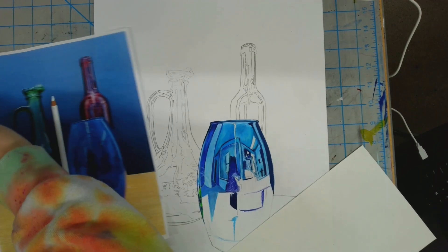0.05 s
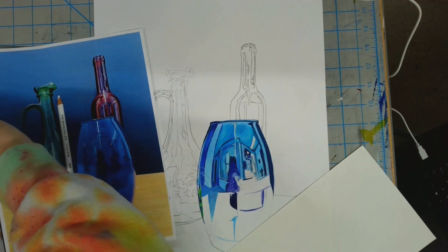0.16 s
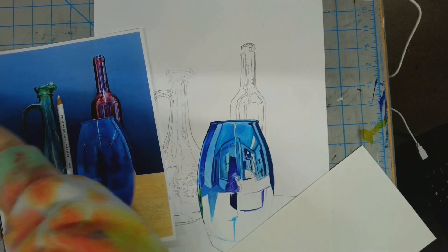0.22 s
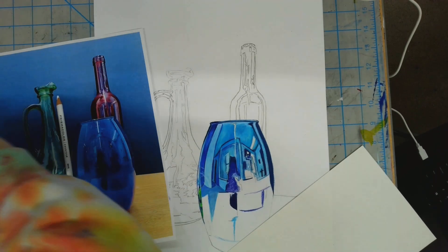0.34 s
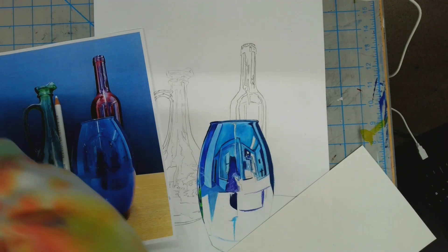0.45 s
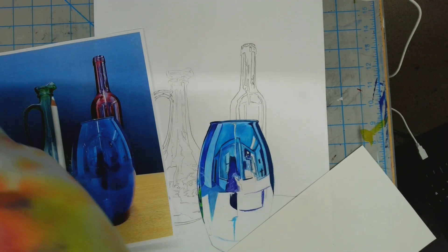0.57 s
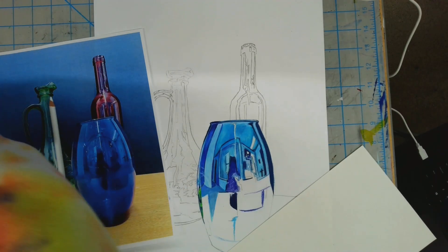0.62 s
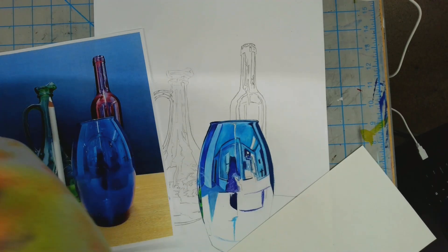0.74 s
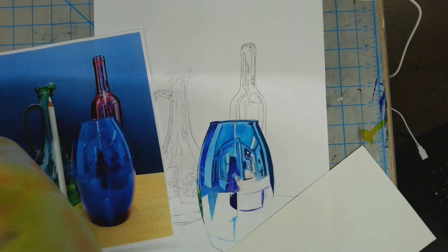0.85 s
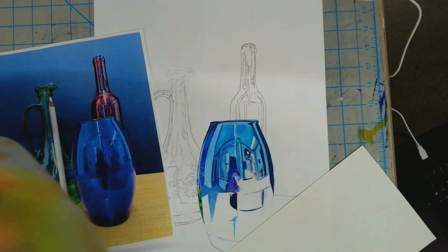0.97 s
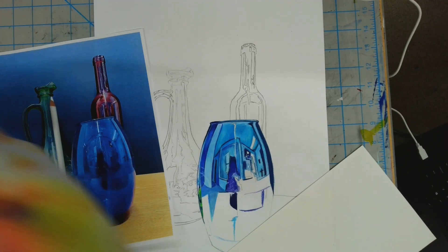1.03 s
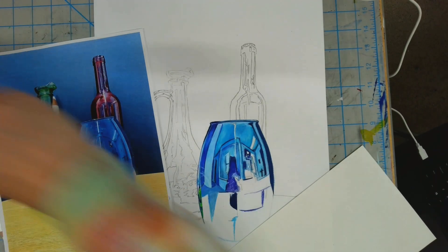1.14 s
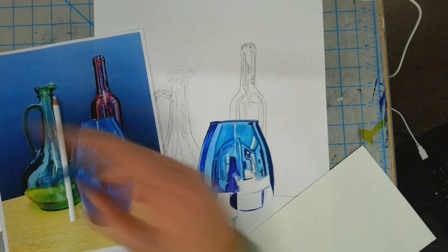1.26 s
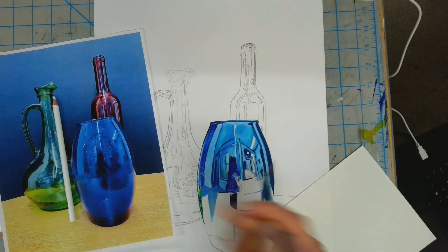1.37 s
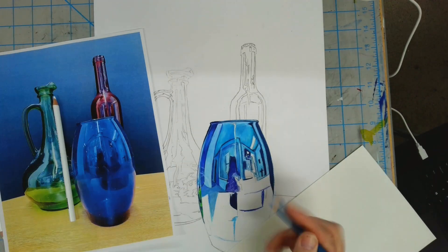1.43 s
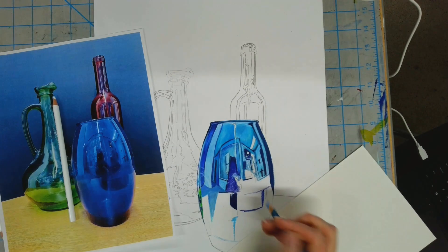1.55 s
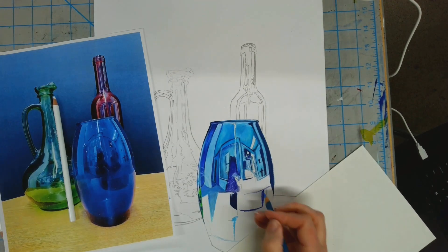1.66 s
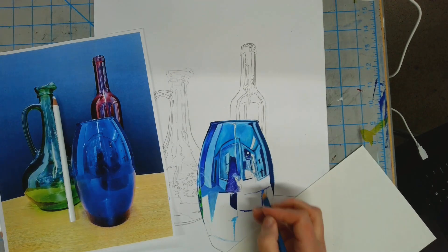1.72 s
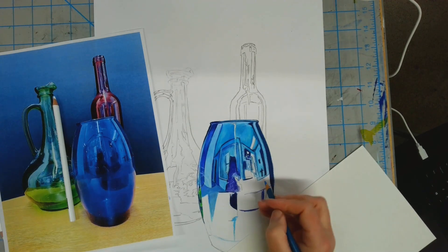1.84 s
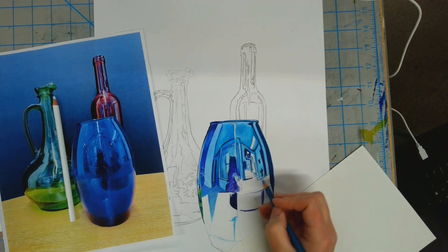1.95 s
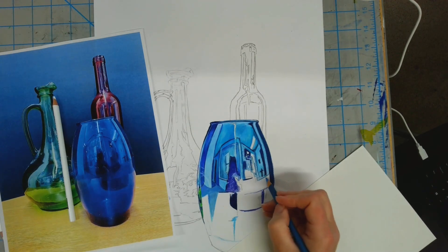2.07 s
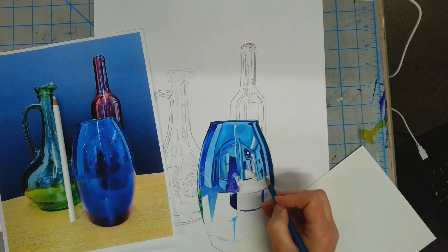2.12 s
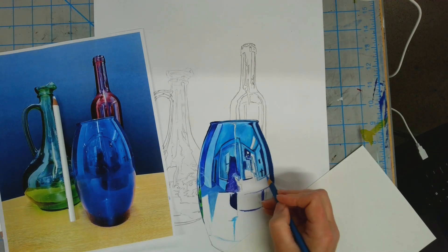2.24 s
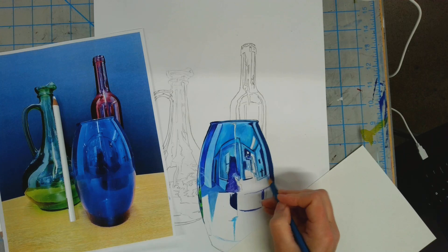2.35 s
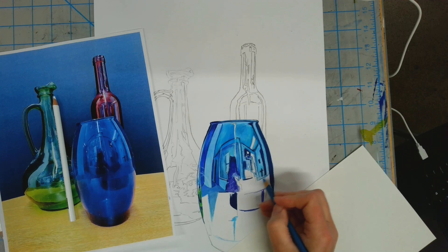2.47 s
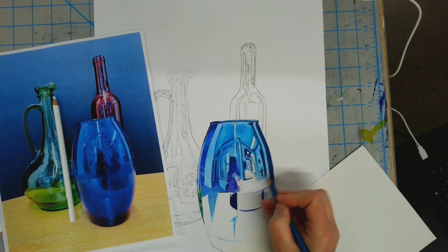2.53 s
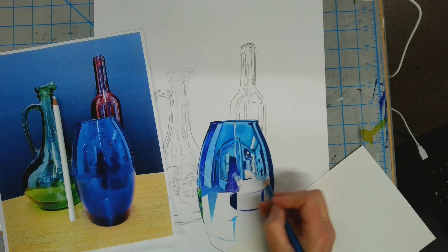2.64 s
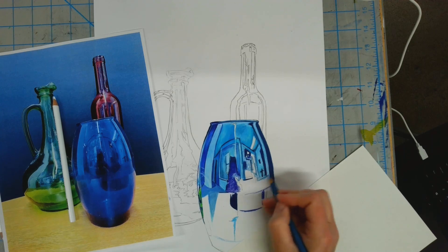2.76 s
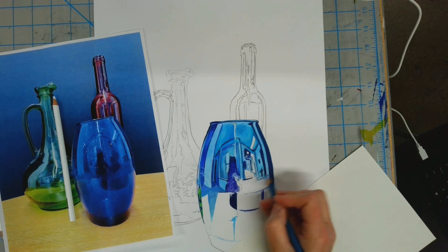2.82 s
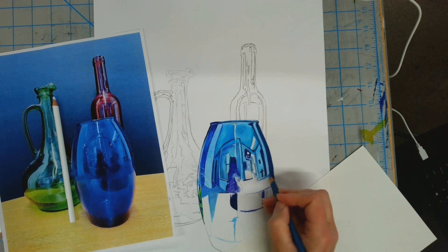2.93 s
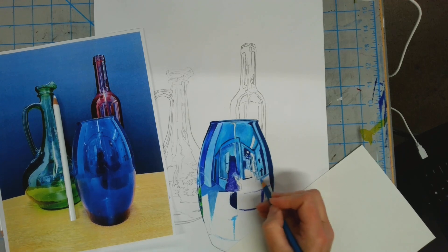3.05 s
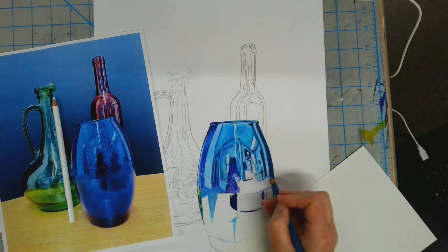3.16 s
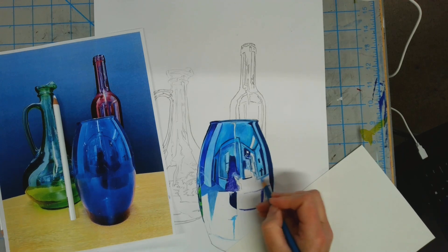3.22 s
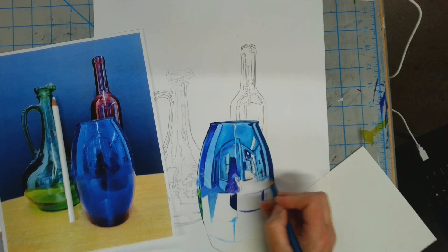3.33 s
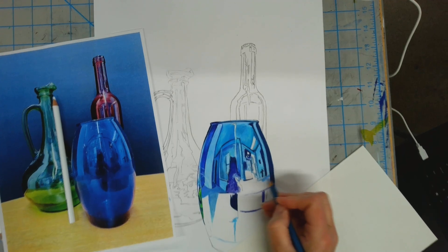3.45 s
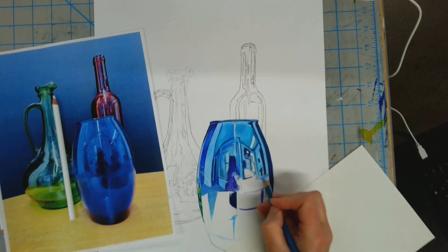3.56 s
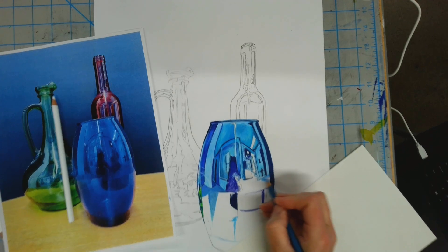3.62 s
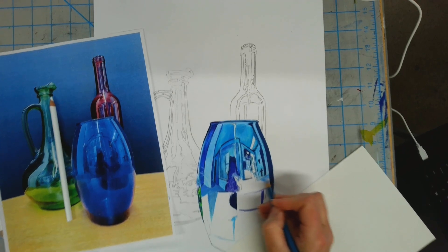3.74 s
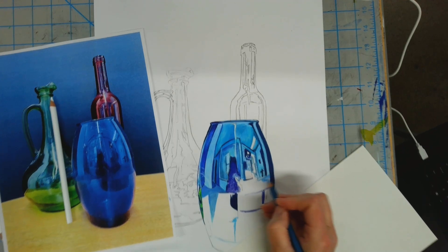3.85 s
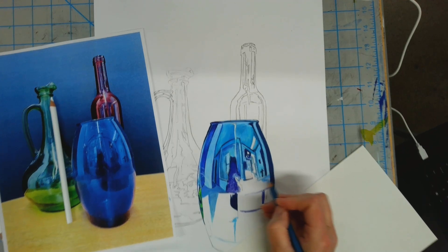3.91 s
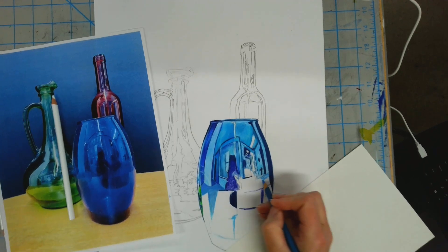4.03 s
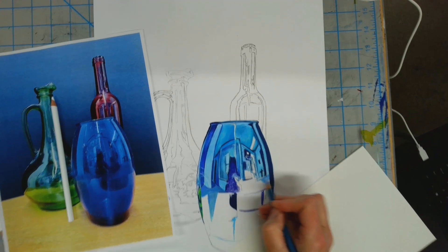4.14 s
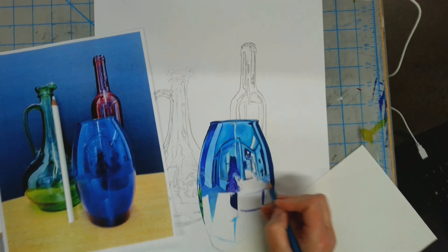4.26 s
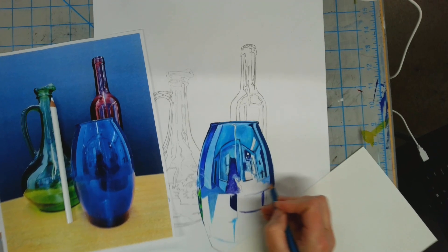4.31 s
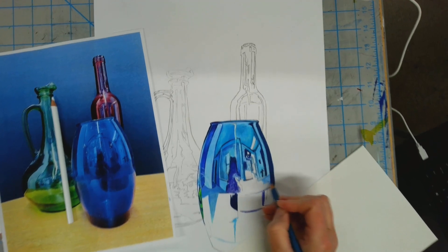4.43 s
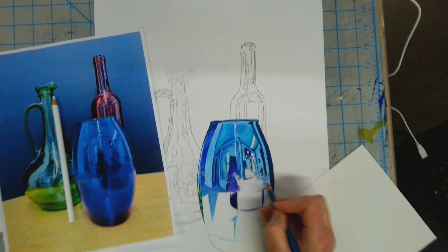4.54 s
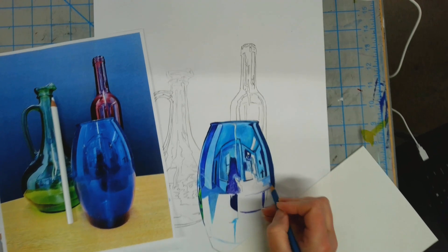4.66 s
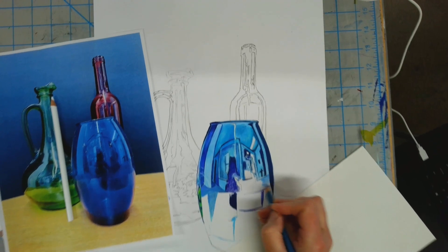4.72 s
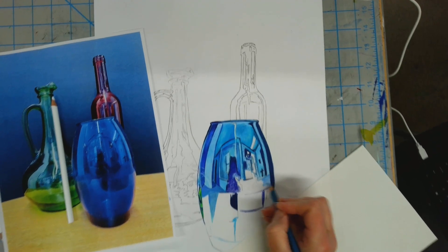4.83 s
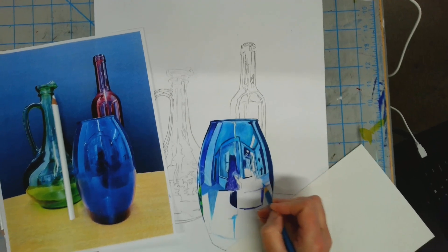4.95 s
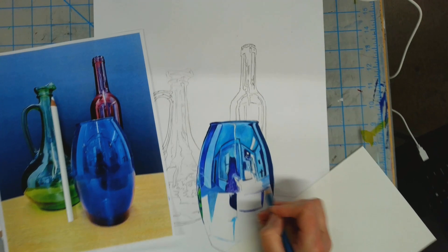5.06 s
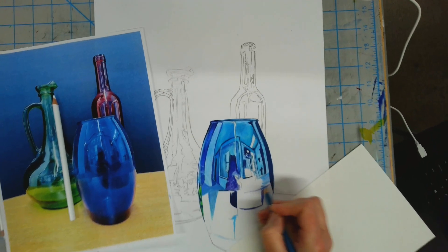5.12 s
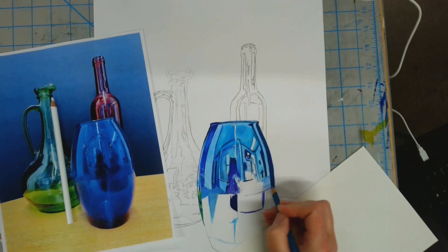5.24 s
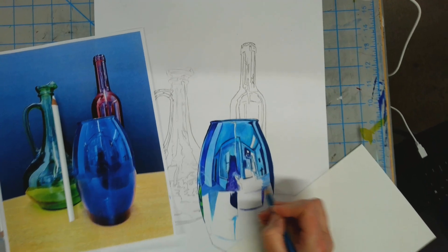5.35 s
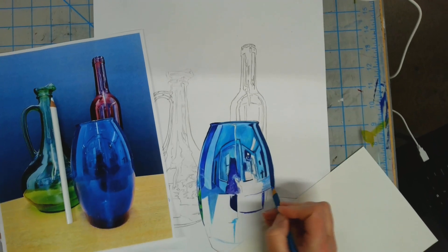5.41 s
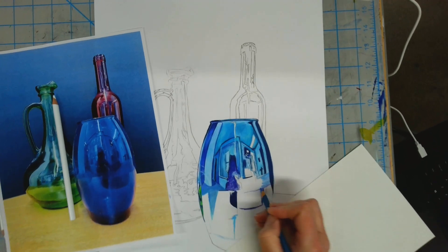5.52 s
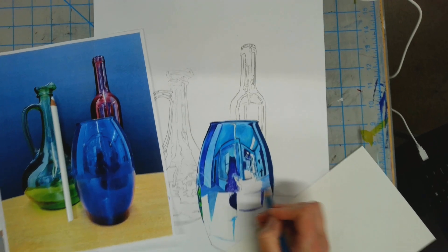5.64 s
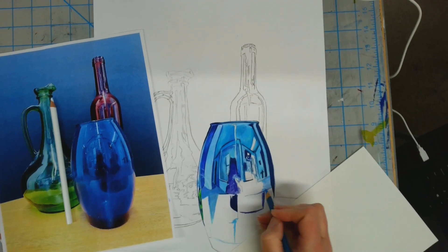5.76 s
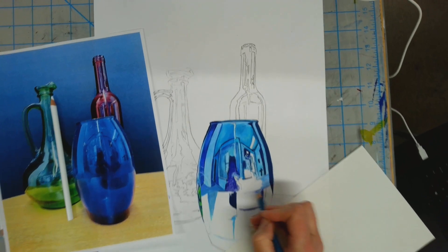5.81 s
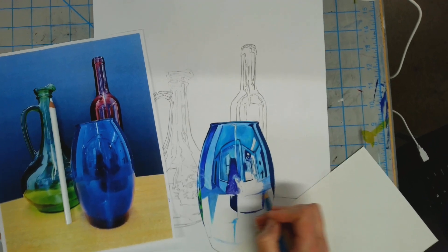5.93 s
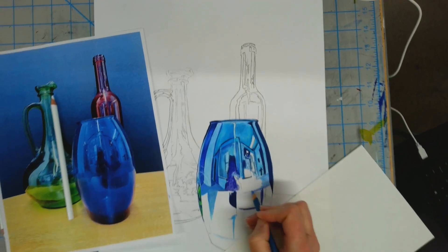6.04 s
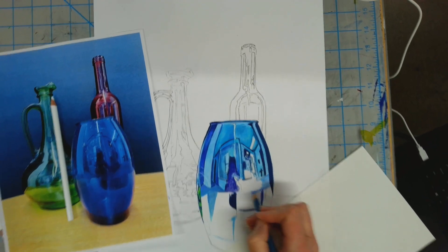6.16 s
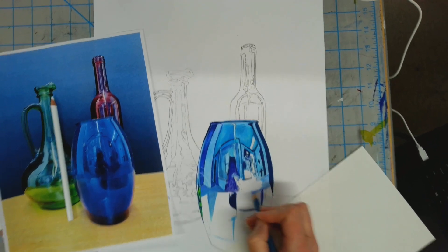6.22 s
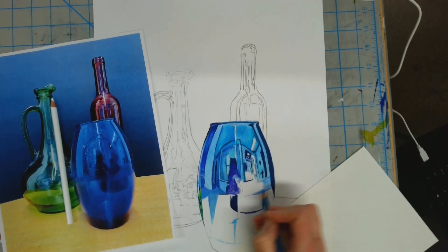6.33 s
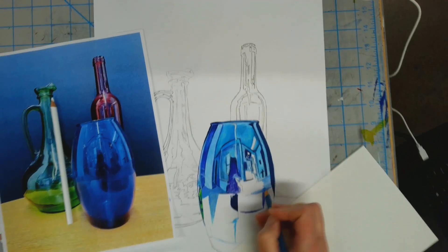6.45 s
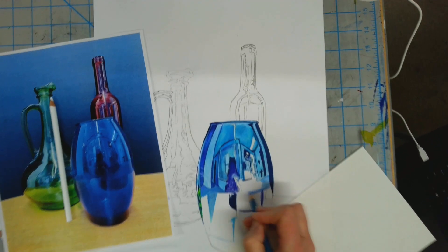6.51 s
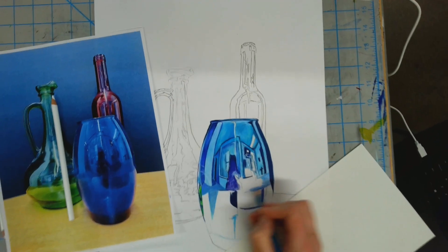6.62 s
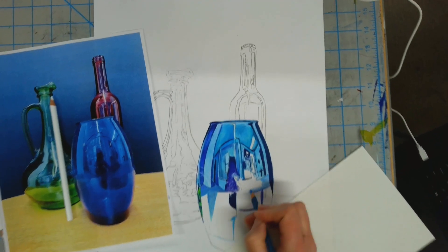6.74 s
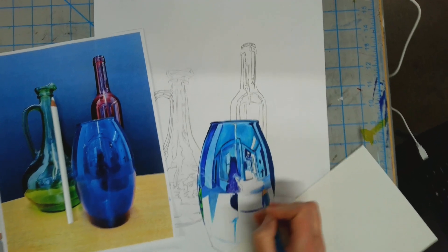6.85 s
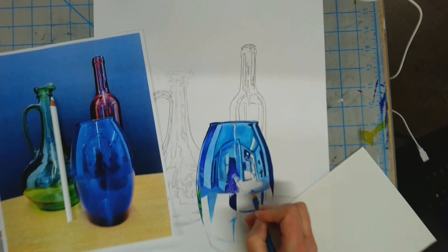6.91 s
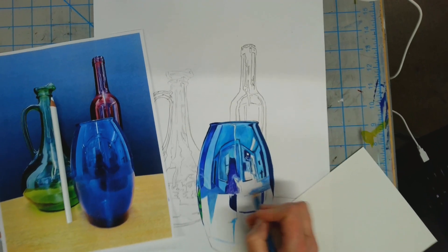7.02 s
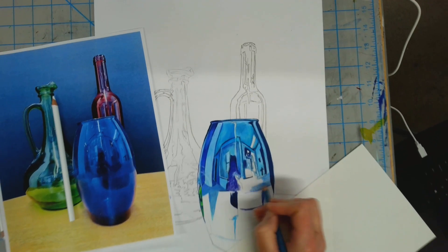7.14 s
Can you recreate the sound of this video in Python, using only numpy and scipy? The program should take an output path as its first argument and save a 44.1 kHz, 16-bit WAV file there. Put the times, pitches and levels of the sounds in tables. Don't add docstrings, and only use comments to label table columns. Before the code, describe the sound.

A sheet slides, a pencil clatters down and rattles on a desk, then quick steady pencil shading scratches on paper in a quiet room.

```python
import sys
import numpy as np
from scipy import signal
from scipy.fft import rfft, irfft
from scipy.io import wavfile
from scipy.ndimage import uniform_filter1d

SR = 44100
rng = np.random.default_rng(int(sys.argv[2]) if len(sys.argv) > 2 else 0)


def volts_from_db(level):
    exponent = np.asarray(level, float) / 20
    return 10 ** exponent


def master_out(mix):
    frames = np.transpose(np.atleast_2d(mix))
    ceiling = np.clip(frames, -1, 1)
    pcm = np.round(ceiling * 32767).astype(np.int16)
    wavfile.write(sys.argv[1], SR, pcm)


N = 316638
TIME = np.arange(N) / SR

# f/Hz, level/dB
AIR_COLOUR = [(25, -72), (45, -37.5), (80, -17.5), (126, -2.5), (185, -1), (264, -8.5), (340, -11.5),
              (480, -16), (620, -22), (870, -24.5), (1100, -30.5), (1840, -35.5), (3700, -41.5),
              (10600, -48)]
# t/s, level/dB
RUMBLE_SWELL = [(0.0, -48), (0.16, -46.5), (0.26, -53.5), (0.66, -46.5), (0.76, -51), (0.94, -47),
                (1.1, -57), (1.2, -49), (1.7, -52), (1.84, -47), (2.1, -53.5), (3.16, -51), (5.36, -52),
                (5.62, -50.5), (6.4, -51), (6.76, -52.5), (6.86, -46), (7.18, -52)]
# t/s, level/dB, t60/s
FAR_KNOCKS = [
    (4.402, -59.5, 0.84),
]
# f/Hz, density/dB
ROOM_COLOUR = [(600, -22), (1200, 4), (2000, 6.5), (3000, 2.5), (4500, 2), (7000, -0.5), (10000, -24.5)]
# t/s, level/dB
SLEEVE_LEVEL = [(0, -71.5), (.45, -66), (1.15, -66), (1.45, -69), (2.3, -73), (4.3, -69), (5.6, -69),
                (7.18, -68.5)]
# f/Hz, density/dB
CLOTH_COLOUR = [(1200, -28.5), (2500, -15), (4500, -12), (6000, -7), (7000, 0.5), (8000, -8), (9500, -20),
                (10800, -31.5)]
# t/s, hiss level/dB
SLIDES = [
    [(0.0, -42), (0.03, -49.5), (0.118, -41.5), (0.166, -68)],
    [(1.5, -73), (1.63, -80), (1.702, -58.5), (1.728, -66.5), (1.822, -53.5), (2.042, -61.5), (2.094, -77)],
]
# f/Hz, density/dB
SLIDE_COLOUR = [(2530, -37), (4300, -10.5), (4800, -10), (5710, -13), (6930, -4), (7470, -7.5),
                (8340, -17.5), (9280, -21.5), (10000, -27.5), (10600, -30.5), (13800, -69), (22000, -120)]
# f/Hz, density/dB
DRAG_COLOUR = [(250, -20), (600, -2), (1200, -12.5), (2200, -14.5), (3300, -2), (4300, 5), (5500, -3),
               (7000, -27.5), (9000, -59.5)]
# t/s, peak/dB, ring f/Hz, ring share/dB, weight on the desk/dB
TAPS = [(0.2093, -48, 7500, -9, -17), (0.2274, -60, 6900, -10, -22), (0.4442, -48, 3230, 4, -10),
        (0.4725, -27, 6500, -1, -23.5), (0.4805, -37, 6610, -1, -38), (0.494, -49, 7080, 10, -24),
        (0.506, -37, 7180, -9, -20), (0.5156, -13.5, 7140, -10, -10), (0.5246, -22.5, 6810, -19, -2.5),
        (0.5442, -32.5, 3230, 2, -20), (0.5521, -50, 3250, -14.5, 3), (0.5641, -32, 3290, 0, -4.5),
        (0.6405, -30.5, 7640, 5, -13), (0.6542, -43, 7460, -6, -6), (0.731, -36.5, 4970, -12, -17),
        (0.7972, -19, 6740, 0.5, -21), (0.8062, -32, 6550, -21, -24), (0.8125, -25, 6700, -8, -28),
        (0.8219, -32, 6550, -32, -37), (1.069, -46, 7340, 5.5, -27), (1.244, -63, 6950, 13, -34),
        (1.3604, -60, 6800, 5, -19)]
# f/Hz, level/dB, t60/s
DESK_MODES = [(140, -27, .04), (363, -12, 0.041), (496, -0.5, 0.018), (676, -5, 0.027), (1178, 2, 0.093),
              (1430, -3.5, 0.047), (1517, 3, 0.032), (1830, 2.5, 0.029), (2290, -0.5, 0.063),
              (2770, -3, 0.018), (2930, -0.5, 0.019)]
# f/Hz, density/dB
CRACK_COLOUR = [(880, -23), (1500, -14), (2900, -3), (3400, -6), (3850, 2.5), (5600, -9), (7150, 7),
                (9560, -24), (10600, -35), (13800, -118), (22000, -120)]
# f/Hz, density/dB
BOUNCE_COLOUR = [(880, -33), (1500, -34), (2260, -9), (3000, -8.5), (4350, 1), (5470, -6.5), (6450, 6.5),
                 (6830, 3), (10600, -35), (13800, -93), (22000, -120)]
# f/Hz, density/dB
RATTLE_COLOUR = [(410, -11.5), (700, -5.5), (1200, -4), (1680, -16), (1840, -9.5), (5950, -19),
                 (6670, -6.5), (9380, -31), (10600, -30), (13800, -91), (22000, -120)]
# t/s, f/Hz, level/dB, t60/s
PINGS = [(0.5458, 3230, -36, 0.061), (0.566, 3290, -45, 0.06), (0.6402, 4670, -43, 0.06),
         (.7315, 4800, -60, 0.11), (0.5062, 7000, -33, 0.017), (.655, 7600, -56, 0.36),
         (.665, 4740, -65, .2), (.98, 2950, -74.5, .9)]
# start t/s, length/s, tip hiss level/dB
PUSHES = [(2.285, 0.024, -66), (2.44, 0.054, -62), (2.62, 0.051, -58.5), (2.81, .047, -58.5),
          (2.999, .05, -59), (3.18, .044, -57), (3.356, 0.053, -59), (3.55, 0.034, -56.5),
          (3.732, 0.04, -57), (3.92, 0.041, -57.5), (4.107, 0.039, -55), (4.291, 0.043, -57),
          (4.457, 0.07, -57.5), (4.664, 0.049, -58), (4.849, 0.047, -57), (5.029, 0.06, -56.5),
          (5.221, 0.048, -55), (5.414, 0.066, -57), (5.607, 0.062, -56), (5.791, 0.049, -58),
          (5.966, .065, -56.5), (6.149, .056, -58.5), (6.328, 0.052, -59), (6.508, 0.058, -58.5),
          (6.695, 0.047, -61), (6.873, 0.036, -58), (7.053, 0.046, -58)]
# start t/s, length/s, tip hiss level/dB
PULLS = [(2.36, .041, -64.5), (2.528, 0.052, -60.2), (2.712, 0.056, -59.5), (2.904, 0.038, -59.5),
         (3.082, 0.062, -59.5), (3.269, 0.055, -58), (3.451, 0.052, -58), (3.64, 0.046, -59.5),
         (3.82, 0.054, -60), (4.006, .052, -59.5), (4.192, 0.05, -58), (4.381, .059, -57),
         (4.563, .059, -58.5), (4.751, .051, -57), (4.94, 0.044, -57.5), (5.125, 0.045, -56),
         (5.312, 0.051, -56.5), (5.512, 0.047, -56.5), (5.701, 0.046, -58.5), (5.885, 0.036, -56),
         (6.059, 0.047, -56), (6.234, 0.059, -56), (6.414, 0.059, -56.5), (6.594, 0.067, -59.5),
         (6.779, .054, -57.5), (6.956, 0.053, -55), (7.152, 0.016, -57)]
# t/s, sheet body minus hiss/dB, pressure gain start to end/dB, share of the sharp point/0-1
PUSH_GRIP = [(2.3, -14.5, 4, 0.4), (3.6, -13.5, -0.5, 0.35), (5.2, -14, -5.5, 0.5), (5.9, -10, -10, 0.2),
             (7.1, -12, -3, 0.5)]
# t/s, body minus hiss/dB, pressure gain/dB, sharp share/0-1
PULL_GRIP = [(2.3, -15, 6, 0.58), (3.3, -14.5, -3, 0.5), (5.0, -15.5, 1.5, 0.57), (6.0, -13, 5.5, .3),
             (7.1, -14.5, 6.5, .6)]
# f/Hz, density/dB
POINT_COLOUR = [(2530, -44), (4300, -20), (5040, -18), (5820, -12.5), (6650, -0.5), (7470, 2), (8660, -7),
                (9000, -19.5), (10000, -25), (10600, -17.5), (13800, -68.5), (22000, -120)]
# f/Hz, density/dB
FLANK_COLOUR = [(2530, -38), (4300, -16.5), (5000, -12.5), (5870, -7.5), (6750, -4.5), (7040, -0.5),
                (8190, -15), (8960, -23), (9970, -24.5), (10600, -27), (13800, -66.5), (22000, -120)]
# f/Hz, density/dB
SHEET_COLOUR = [(900, -28.5), (1800, -18), (2600, -6), (3300, 0), (4300, 5), (5500, -24), (7000, -3.5),
                (9000, -61)]
# t/s, share of mid lines kept/0-1
STARVED = [(.173, .08), (.637, .04), (.776, .07), (1.473, .015), (1.518, .07), (1.773, .04), (2.334, .08),
           (2.773, .02), (3.309, .03), (3.4, .04), (3.468, .02), (4.074, .02), (4.167, .04), (4.259, .03),
           (4.885, .02), (5.024, .02), (5.117, .01), (5.374, .04), (5.721, .04), (6.024, .05),
           (6.418, .004), (6.441, .008), (6.999, .02)]
TOP_HZ = 11300


def colour(x, points, size=1024):
    hz, db = np.transpose(points)
    grid = np.maximum(np.arange(size + 1) * SR / (2 * size), 1)
    gain = volts_from_db(np.interp(np.log(grid), np.log(hz), db))
    cepstrum = irfft(np.log(gain))
    cepstrum[1:size] *= 2
    cepstrum[size + 1:] = 0
    response = irfft(np.exp(rfft(cepstrum)))
    response = response / np.sqrt(np.sum(response ** 2))
    return signal.fftconvolve(x, response)[:len(x)]


def walk(rate):
    hold = int(SR / rate)
    steps = np.repeat(rng.standard_normal(N // hold + 1), hold)
    smooth = uniform_filter1d(uniform_filter1d(steps, hold), hold)
    return 1.3 * smooth[:N]


def ring(t, hz, t60):
    return np.sin(2 * np.pi * hz * t) * volts_from_db(-60 * t / t60)


def slips(scatter_db, patchy_db):
    size = rng.standard_normal(N) * volts_from_db(scatter_db * rng.exponential(size=N))
    return size / np.sqrt(np.mean(size ** 2)) * volts_from_db(patchy_db * walk(60))


def air():
    wash = colour(rng.standard_normal(N), AIR_COLOUR, size=4096)
    low = signal.sosfiltfilt(signal.butter(2, 350, fs=SR, output="sos"), wash)
    swell_db = np.interp(TIME, *np.transpose(RUMBLE_SWELL)) + 0.5 + 0.74 * walk(9.9)
    fan_level = np.sqrt(2) * volts_from_db(-69.5 + 1.0 * walk(2.5))
    fan_hz = 181.4 * (1 + 0.01187 * walk(3.6))
    fan = fan_level * np.sin(2 * np.pi * np.cumsum(fan_hz) / SR)
    return volts_from_db(swell_db) * low + volts_from_db(-53) * (wash - low) + fan


def far_knock():
    fade = np.zeros(N)
    for start, db, t60 in FAR_KNOCKS:
        fade += volts_from_db(db - 60 * np.maximum(TIME - start, 0) / t60) * (TIME >= start)
    return colour(fade * rng.standard_normal(N), ROOM_COLOUR)


def sliding():
    hiss, body = np.zeros((2, N))
    for t, db in map(np.transpose, SLIDES):
        drag_db = np.interp(TIME, t, db, left=-160, right=-160)
        hiss += volts_from_db(drag_db + 2.5)
        body += volts_from_db(-49 - 9 + 0.7 * (drag_db + 50.5))
    tooth = slips(scatter_db=2.0, patchy_db=0.4)
    sleeve = volts_from_db(np.interp(TIME, *np.transpose(SLEEVE_LEVEL))) * slips(scatter_db=1.9, patchy_db=1.0)
    drag = colour(hiss * tooth, SLIDE_COLOUR) + colour(body * tooth, DRAG_COLOUR)
    return drag + colour(sleeve, CLOTH_COLOUR)


def taps():
    out, t = np.zeros(N + SR), np.arange(SR // 2) / SR
    rise = 1 - np.exp(-t / 0.00016)
    desk = sum(volts_from_db(db) * ring(t, hz, t60) for hz, db, t60 in DESK_MODES)
    for start, db, hz, ring_db, weight_db in TAPS:
        noise = rng.standard_normal((3, len(t)))
        burst = (t == 0) + volts_from_db(-14.5) * noise[0] * volts_from_db(-60 * t / 0.014)
        crack = colour(burst, CRACK_COLOUR if start < 0.7 else BOUNCE_COLOUR, size=256)
        crack = crack / np.abs(crack).max() + volts_from_db(-10) * ring(t, 4900, 0.0055)
        rattle_db = -16 + 0.45 * weight_db - 0.46 * (db + 39)
        rattle = colour(noise[1] * volts_from_db(-60 * t / 0.45), RATTLE_COLOUR, size=256)
        room = colour(noise[2] * volts_from_db(-60 * t / 0.72), ROOM_COLOUR, size=256)
        hit = crack + volts_from_db(ring_db) * ring(t, hz, 0.011) + volts_from_db(weight_db - 11) * desk
        hit += volts_from_db(rattle_db) * rattle + volts_from_db(-39) * room
        out[int((start + 0.0007) * SR):][:len(t)] += volts_from_db(db) * rise * hit
    for start, hz, db, t60 in PINGS:
        out[int(start * SR):][:len(t)] += volts_from_db(db) * rise * ring(t, hz, t60)
    return out[:N]


def shading():
    point, flank, body = np.zeros((3, N))
    for strokes, grip_table in ((PUSHES, PUSH_GRIP), (PULLS, PULL_GRIP)):
        when, *grip = np.transpose(grip_table)
        for start, length, db in strokes:
            body_db, lean_db, sharp = (np.interp(start, when, column) for column in grip)
            span = slice(int((start - 0.011) * SR), min(int((start + length + 0.011) * SR), N))
            place = np.clip((TIME[span] - start + 0.01) / (length + 0.022), 0, 1)
            speed = np.tanh(1.94 * np.sin(np.pi * place) ** 1.01)
            rub = volts_from_db(db + 3.0 + lean_db * (place - 0.5)) * speed
            point[span] += np.clip(sharp, 0, 1) * rub
            flank[span] += np.clip(1 - sharp, 0, 1) * rub
            body[span] += volts_from_db(body_db) * rub
    tooth = slips(scatter_db=1.3, patchy_db=0.8)
    tip = colour(point * tooth, POINT_COLOUR) + colour(flank * tooth, FLANK_COLOUR)
    return tip + colour(body * tooth, SHEET_COLOUR)


def scene():
    return np.tile(air() + far_knock() + sliding() + taps() + shading(), (2, 1))


def starve(x):
    frame, offset = 1024, 420
    low, mid, edge, top = (hz * 2 * frame // SR for hz in (1000, 5000, 8700, TOP_HZ))
    n = np.arange(2 * frame) + 0.5
    k = np.arange(low, top)[:, None] + 0.5
    window = np.sin(np.pi * n / (2 * frame))
    basis = np.sqrt(2 / frame) * window * np.cos(np.pi / frame * (n + frame / 2) * k)
    basis[:, -frame // 8:] = 0
    out = x.copy()
    for t, share in STARVED:
        start = round((t * SR - offset) / frame - 1) * frame + offset
        span = slice(start, start + 2 * frame)
        lines = basis @ x[span]
        size = np.abs(lines)
        step = np.full(len(lines), 2 * np.quantile(size[:mid - low], 1 - share))
        step[edge - low:] = 2 * np.quantile(size[edge - low:], 1 - share / 4)
        out[span] += (step * np.round(lines / step) - lines) @ basis
    return out


def band_limit(x):
    return signal.sosfilt(signal.butter(12, 10780, fs=SR, output="sos"), x)


def record(dry):
    cut = signal.sosfilt(signal.cheby2(10, 50, TOP_HZ, fs=SR, output="sos"), dry[0])
    mix = np.tile(starve(cut), (2, 1))
    return band_limit(mix)


dry = scene()
out = record(dry)
master_out(out)
```